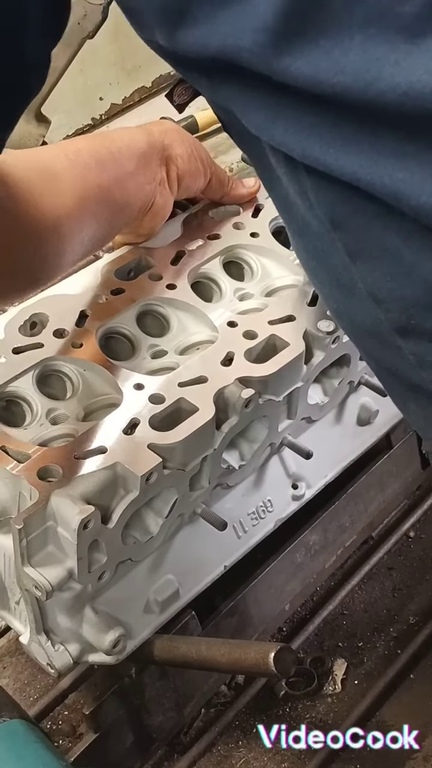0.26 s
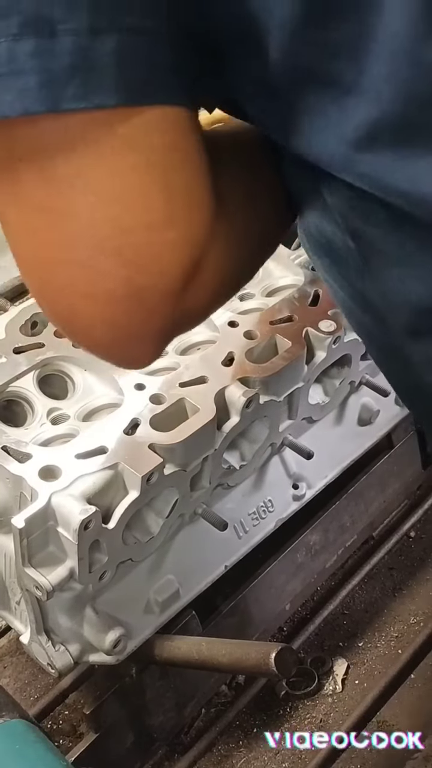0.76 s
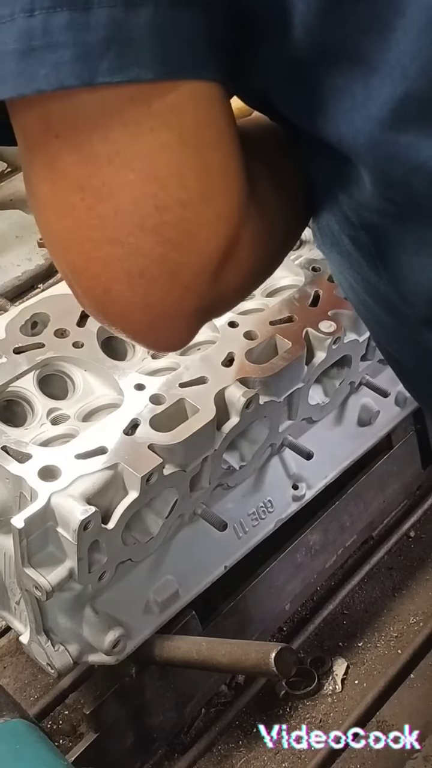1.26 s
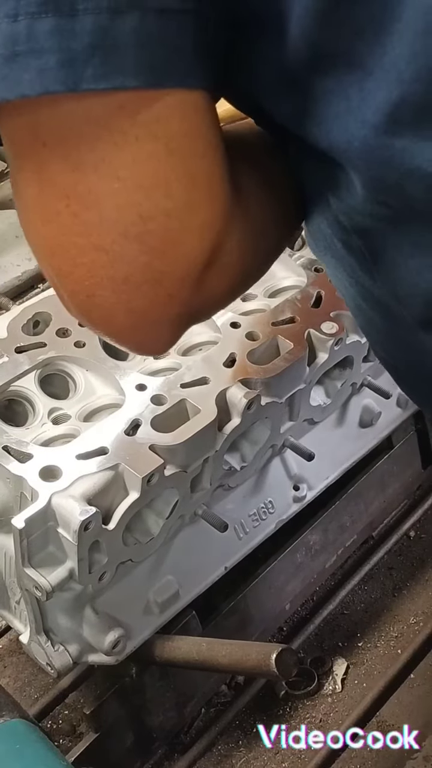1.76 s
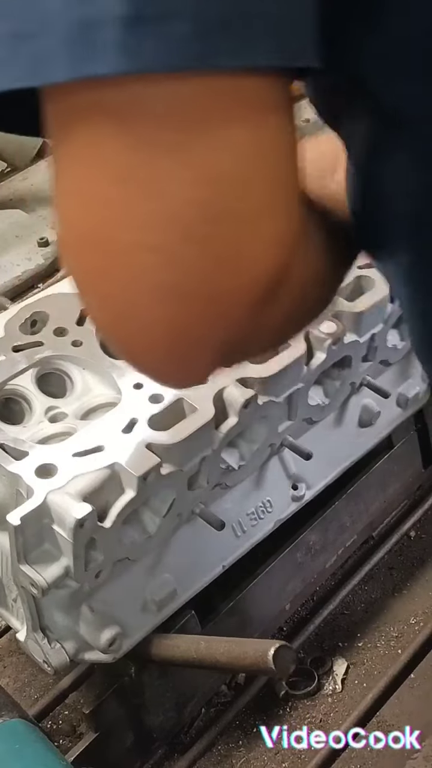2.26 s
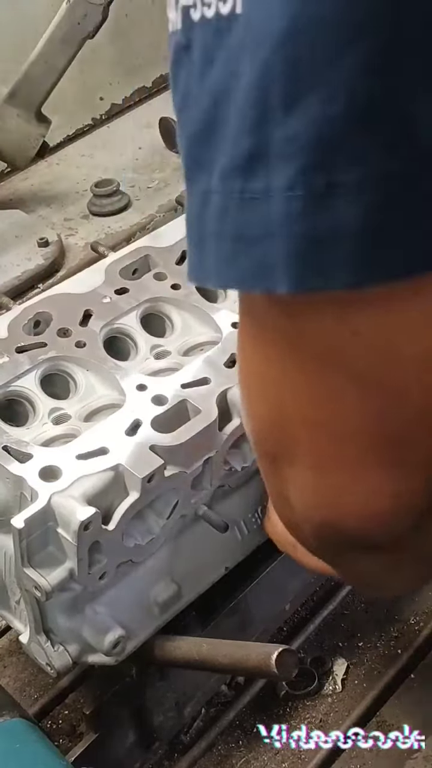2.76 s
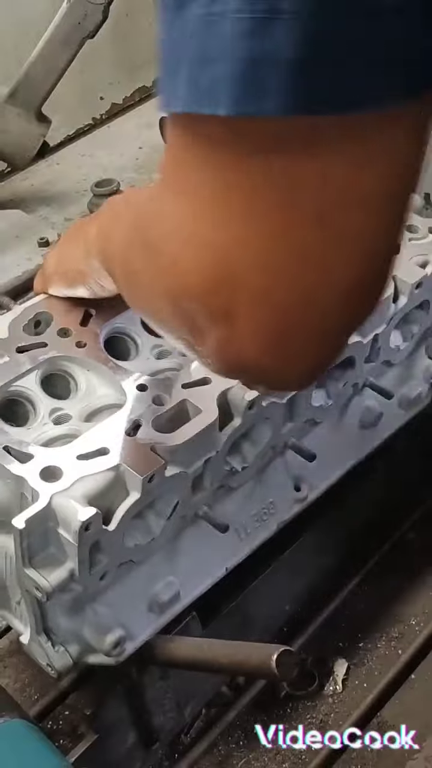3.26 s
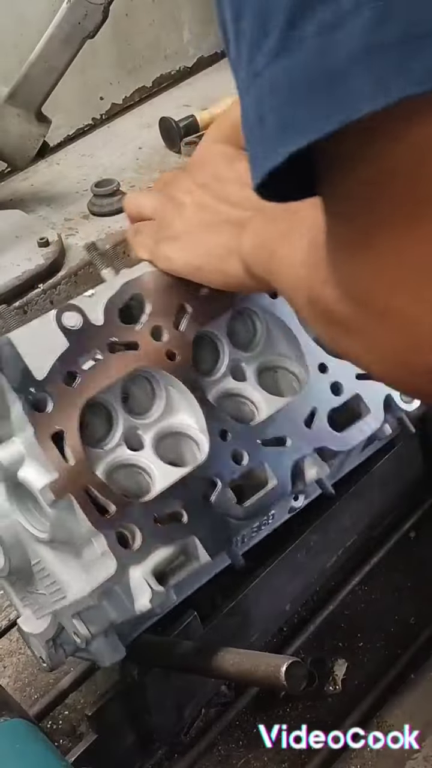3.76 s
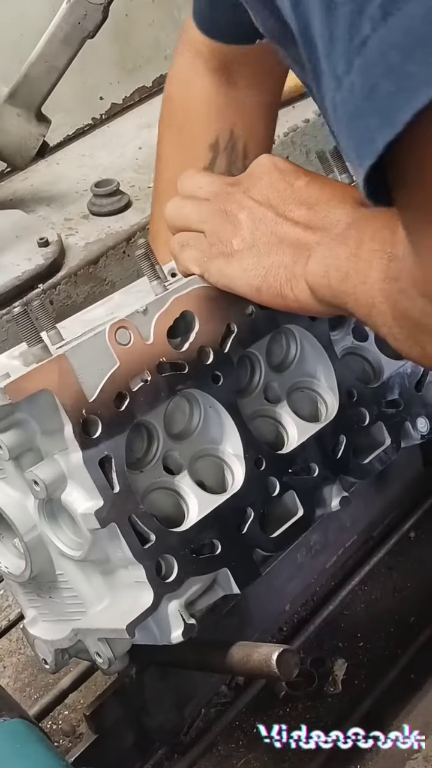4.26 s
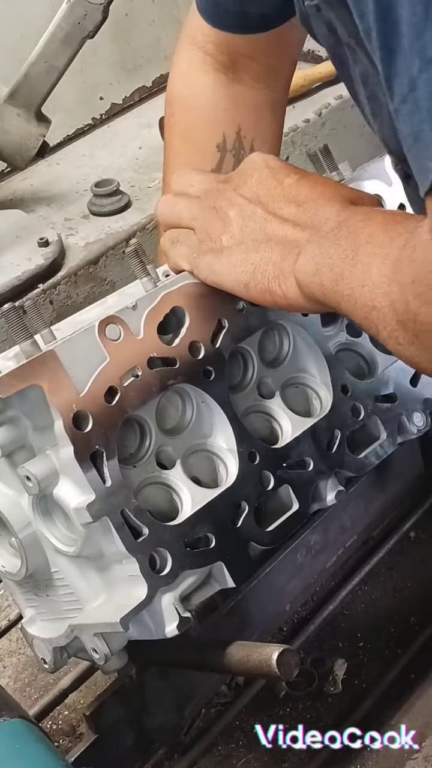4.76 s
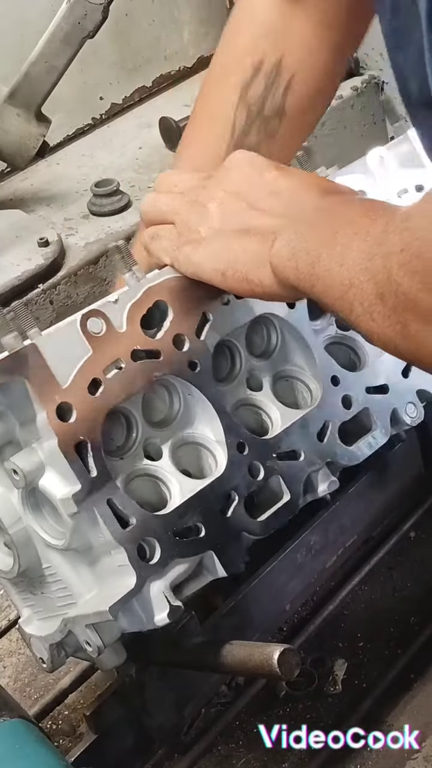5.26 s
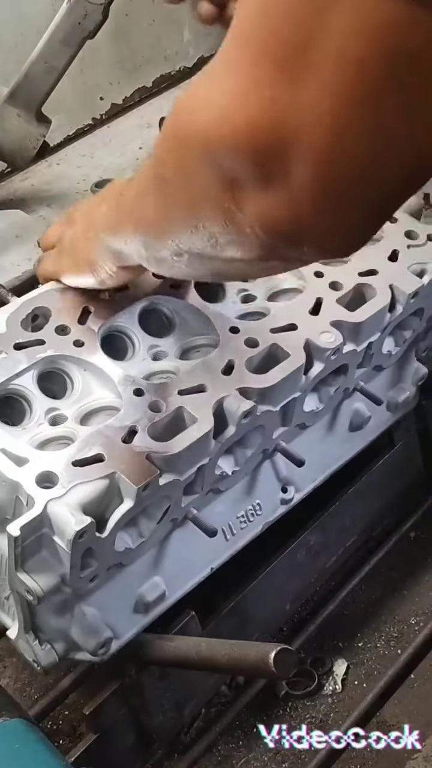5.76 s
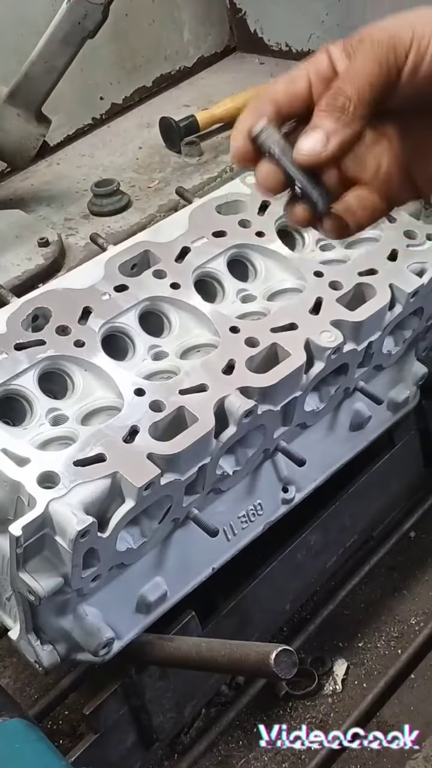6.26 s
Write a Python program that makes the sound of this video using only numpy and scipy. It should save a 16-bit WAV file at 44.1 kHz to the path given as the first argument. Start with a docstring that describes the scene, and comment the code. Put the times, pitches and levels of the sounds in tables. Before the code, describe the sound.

An air hammer rattles in seven short bursts on an aluminium engine head, then the tool is put down and the casting is knocked about on a steel bench.

```python
"""Air hammer on a cylinder head

An air hammer drives a steel punch into an aluminium cylinder head in short bursts, in a hard-walled shop.
Each piston blow is a burst of shaped noise that rings punch and casting modes and lets out a puff of air.
A rattling swell of exhaust air ends the last burst. Then the tool is laid down and the head tipped up and
dropped on the steel bench: softened noise knocks and scrapes, thumps, bench modes and low sagging groans,
over a sine motor hum, noise rumble and a hiss that comes up at about 3 s and ebbs near the end."""
import sys
import numpy as np
from scipy import signal
from scipy.fft import rfft, irfft, next_fast_len
from scipy.io import wavfile

SR = 44100
rng = np.random.default_rng(int(sys.argv[2]) if len(sys.argv) > 2 else 0)


def unload_wav(signal):
    """Save mono or channel-first audio to the path in sys.argv[1] as 16-bit WAV at rate SR, clipped to [-1, 1]."""
    wavfile.write(
        sys.argv[1],
        SR,
        np.round(np.clip(np.atleast_2d(signal).T, -1, 1) * 32767).astype(np.int16),
    )


N = 287513
T = np.arange(N) / SR
FREQS = np.arange(N // 2 + 1) * SR / N
TOP_HZ = 15900  # upper edge of the sound, also the brightness of a hammer blow
RECOIL_DB = -43  # kick of the tool

# trigger pulls: (first blow [s], last blow [s], blows [count], valve shut [s],
# strike [dB, relative], air [dB, relative])
TRIGGER_PULLS = [(-0.01, 0.0757, 5, 0.034, -40, -41.5), (0.2268, 0.311, 4, 0.3, -39, -42.5),
                 (0.5639, 0.604, 2, 0.59, -36, -50.5), (0.8283, 0.8953, 2, 0.84, -37.5, -47),
                 (1.0169, 1.1, 3, 1.062, -37.5, -44.5), (1.2714, 1.364, 4, 1.378, -42, -43.5),
                 (1.526, 1.6288, 5, 1.686, -40.5, -44.5)]
# exhaust air spectrum: (frequency [Hz], density [dB per Hz, relative])
AIR_SPECTRUM = [(40, 4), (130, 5.5), (400, 4), (900, 5), (2500, 4), (4000, 0.5), (5100, -1), (8000, 3.5),
                (9300, -11), (11000, 5), (13700, 6.5), (16000, -3)]
# knocks of tool and casting: (time [s], clack [dB, relative], thump [dB, relative],
# ring [dB, relative], brightness [Hz])
KNOCKS = [(0.765, -55.5, -80, -79, 6160), (1.784, -44.5, -66, -70, 11300), (1.95, -55.5, -71.5, -80, 9400),
          (2.384, -45.5, -48, -69, 5570), (3.0, -67, -61, -85, 900), (3.122, -46.5, -53, -61, 4000),
          (3.43, -63.5, -58.5, -80, 610), (3.735, -49.5, -48.5, -63, 1300),
          (4.016, -51.5, -50.5, -56.5, 1560), (4.453, -59, -68, -68, 1570), (5.041, -61.5, -69, -68, 3970),
          (5.676, -33, -43.5, -46, 6740), (5.729, -47, -47.5, -49.5, 4450), (5.77, -34.5, -39.5, -54, 5770),
          (5.886, -55, -53, -70, 1320), (6.144, -35.5, -39, -52.5, 8800)]


def undb(db):
    """Decibels to gain."""
    return 10 ** (np.asarray(db) / 20)


def at_hz(points, hz):
    """Read (frequency, value) points on a log-frequency axis."""
    f, value = np.transpose(points)
    return np.interp(np.log(hz + 1e-9), np.log(f), value)


def fader(rows):
    """Gain over time from (time [s], level [dB]) rows."""
    return undb(np.interp(T, *np.transpose(rows)))


def noise(spectrum, tilt=0):
    """Stereo noise of rms 1 with this spectrum, tilted in dB per octave above 300 Hz; the bass is most alike."""
    # between the two microphones: (frequency [Hz], likeness [-1 to 1])
    likeness = [(40, 1), (120, 0.8), (300, 1), (700, 0.47), (2000, -0.63), (5000, -0.105), (16000, -0.17)]
    shape = (2, len(FREQS))
    mid, side = rng.standard_normal(shape) * np.exp(2j * np.pi * rng.random(shape))
    like = np.clip(at_hz(likeness, FREQS), -1, 1)
    pair = mid * np.sqrt(1 + like) + np.array([[1], [-1]]) * side * np.sqrt(1 - like)
    colour_db = at_hz(spectrum, FREQS) + tilt * np.log2(np.maximum(FREQS, 300))
    x = irfft(pair * undb(colour_db), next_fast_len(N, True))[:, :N]
    return x / x.std()


def pulse(start, rise, decay, hold=0):
    """Envelope that climbs for rise seconds, holds, then dies away."""
    age, rise = T - start, max(rise, 1e-4)
    climb = np.clip(age / rise, 0, 1)
    return climb * np.exp(-np.maximum(age - rise - hold, 0) / max(decay, 1e-4))


def soften(x, hz):
    """A softer contact pushes for longer and loses the treble above hz."""
    return signal.sosfilt(signal.butter(2, min(hz, SR * .45), fs=SR, output="sos"), x)


def convolve(x, response):
    """Play a sound through a stereo response of unit energy per channel on average."""
    return signal.fftconvolve(x, response / np.sqrt(np.sum(response ** 2) / 2), axes=1)[:, :N]


def ring(modes, hits, scatter_db=2):
    """Decaying sine modes; each (time, level, brightness) hit excites its own mixture of them."""
    times, levels, bright = np.transpose(hits)
    samples = (np.maximum(times, 0) * SR).astype(int)
    out = 0
    for hz, db, t60 in modes:
        scatter = scatter_db * rng.standard_normal(len(hits))
        force = np.zeros(N)
        # a duller hit drives the high modes less
        force[samples] = undb(levels + db + scatter) / np.hypot(1, (hz / bright) ** 2)
        pole = np.exp((2j * np.pi * hz - np.log(1000) / t60) / SR)
        swing = signal.lfilter([1], [1, -pole], force + 1e-18)
        # the microphones hear each mode slightly out of phase, less so in the bass
        phase = min(hz / 2000, 1) * rng.uniform(-1.06, 1, (2, 1))
        out = out + np.imag(swing * np.exp(1j * phase))
    return out


def cavities(x, db, decay_s):
    """Sound rattles around the ports and chambers of the head, which carves close peaks and notches into it."""
    t = T[:SR // 10]
    decay = np.exp(-t / decay_s) * np.sqrt(2 / (decay_s * SR))
    response = undb(db) * rng.standard_normal(len(t)) * decay
    response = response - soften(response, 590)  # the rattle has little bass
    response[0] += 1  # direct sound
    return convolve(x, np.array([response, response]))


def background(hum_db=-4, rumble_db=-4.0, whistle_db=-15, waver=0.19, flutter_db=2.0, hum_hz=119.5):
    """A motor hum wavering in phase and level, low rumble, and a rising and ebbing hiss with a faint whistle."""
    # spectra: (frequency [Hz], density [dB per Hz, relative])
    rumble_spectrum = [(25, -35), (58, 5), (90, -1), (125, 9), (165, -3.5), (210, -7), (290, -9),
                       (600, -14), (1500, -41)]
    hiss_spectrum = [(200, -0.5), (430, 0), (850, -3.5), (1200, -3.5), (1750, -1.5), (2400, -7.5),
                     (5000, -10), (8000, -8), (9500, -13.5), (13000, -8.5), (16000, -5.5)]
    whistle_spectrum = [(1200, -70), (1690, -16), (1745, -4), (1800, -18), (1900, -25), (2600, -62)]
    # hum and rumble together: (time [s], level [dB])
    bass_fader = [(0, -76), (2.25, -75), (2.5, -57), (2.8, -74), (3.25, -54), (4.45, -59.5), (4.95, -54.5),
                  (5.3, -61), (5.9, -55), (6.52, -63.5)]
    # hiss, which comes up at about 3 s and ebbs near the end: (time [s], level [dB])
    hiss_fader = [(0, -75.5), (3.0, -76.5), (3.13, -65.5), (4.2, -61.5), (5.6, -61), (6.05, -66),
                  (6.52, -67.5)]
    knots = np.linspace(0, T[-1], 50)
    level_drift, phase_drift = [np.interp(T, knots, w) for w in rng.standard_normal((2, 50))]
    tone = np.sin(2 * np.pi * hum_hz * T + waver * phase_drift)
    hum = np.sqrt(2) * undb(flutter_db * level_drift) * tone
    bass = undb(hum_db) * hum + undb(rumble_db) * noise(rumble_spectrum)
    hiss = noise(hiss_spectrum) + undb(whistle_db) * noise(whistle_spectrum)
    return fader(bass_fader) * bass + fader(hiss_fader) * hiss


def blows(stroke_s=0.022, slowing=3.3, first_db=1.5, last_db=-1):
    """Rows (time, strike dB, air dB): a steady piston cycle whose later strokes drift, mostly ever slower."""
    rows = []
    for first, last, count, _, strike_db, air_db in TRIGGER_PULLS:
        k = np.arange(int(round(count)))
        # each stroke's drift is "slowing" times the one before, so the last blow lands on time
        lag = (slowing ** k - 1) / (slowing ** k[-1] - 1)
        times = first + stroke_s * k + lag * (last - first - stroke_s * k[-1])
        # the first blow is accented: the piston has a longer run-up
        accent_db = first_db * (k == 0) + last_db * (k == k[-1])
        rows += [(s, strike_db + db, air_db) for s, db in zip(times, accent_db)]
    return rows


def valve(leak_db=-15, leak_tilt_db=-2.0, open_tilt_db=-0.48, leak_lead_s=0.024, open_lead_s=0.002,
          closing_s=0.011):
    """Air leaks in with a dull hiss, brightens as the trigger is squeezed and bleeds away when it is let go."""
    air, dull, bright = 0, noise(AIR_SPECTRUM, leak_tilt_db), noise(AIR_SPECTRUM, open_tilt_db)
    for first, _, _, shut, _, db in TRIGGER_PULLS:
        leak = first - leak_lead_s  # the leak starts, then the valve is open, before the first blow
        squeeze = np.clip((T - leak) / max(leak_lead_s - open_lead_s, 1e-3), 0, 1)
        bleed = np.exp(-np.maximum(T - shut, 0) / closing_s)
        flow = undb(db + leak_db * (1 - squeeze)) * (T > leak) * bleed
        air = air + flow * (squeeze * bright + np.sqrt(1 - squeeze ** 2) * dull)
    return air


def casting(force, db, t60):
    """A thicket of weak, close modes, drawn as decaying noise, makes the struck head shimmer."""
    # (frequency [Hz], density [dB per Hz, relative])
    shimmer_spectrum = [(300, -21), (1200, -41), (1800, 7), (2500, -34), (3300, 0.5), (4600, 8.5),
                        (5050, 3), (5600, 11.5), (8400, 8.5), (9100, 12.5), (11500, 8), (16000, -12)]
    shimmer = noise(shimmer_spectrum) * np.exp(-np.log(1000) * T / t60)
    return undb(db) * convolve(force, shimmer[:, :SR])


def hammer(strike_db=-3, chatter_s=0.0026, fade_s=0.0074, puff_s=0.0067, puff_over_flow_db=4.5, hollow=0.78):
    """The punch chatters for a few ms at each blow and the cylinder vents through the hollow barrel."""
    # (frequency [Hz], density [dB per Hz, relative])
    strike_spectrum = [(100, -3), (900, -18), (1800, -1.5), (2500, -1.5), (3400, 4), (4500, 2),
                       (5100, -5.5), (6000, -4), (8300, -2), (9100, -8), (11500, -10), (16000, -8)]
    # colour of barrel and exhaust ports: (frequency [Hz], width [Hz], boost [dB, before the hollow factor])
    barrel_colour = [(820, 250, 1), (2500, 350, -2), (3330, 250, 2), (3950, 100, 4), (4170, 120, -5),
                     (4620, 100, 3), (5090, 130, -6), (5960, 100, -4), (7270, 120, 4), (8300, 140, 4),
                     (8790, 130, -9), (9270, 180, -4), (10330, 150, -5), (13750, 160, 4), (14950, 250, 3),
                     (15500, 350, 6)]
    strike = sum(undb(db) * pulse(s, 0.0014, fade_s, hold=chatter_s) for s, db, _ in blows())
    puff = sum(undb(db + puff_over_flow_db) * pulse(s, 0.0028, puff_s) for s, _, db in blows())
    crack = undb(strike_db) * strike * noise(strike_spectrum)
    shimmer = casting(crack, db=-0.5, t60=0.26)
    tool = crack + shimmer + puff * noise(AIR_SPECTRUM) + valve()
    tool = cavities(tool, db=-7, decay_s=0.0034)
    colour_db = sum(db * np.exp(-((FREQS - hz) / width) ** 2) for hz, width, db in barrel_colour)
    return irfft(rfft(tool) * undb(hollow * colour_db), N)


def recoil(decay_s=0.0099):
    """The tool kicks back with a dry thud of low noise at each blow."""
    # (frequency [Hz], density [dB per Hz, relative])
    thud_spectrum = [(25, -42), (60, 0.5), (160, 6), (230, -12), (450, -0.5), (900, -1), (2000, -1),
                     (6000, -25)]
    kicks = sum(pulse(s, 0.0019, decay_s) for s, _, _ in blows())
    return undb(RECOIL_DB) * noise(thud_spectrum) * kicks


def ringing(punch_db=-21, head_db=-25, bounce_db=-3, bench_db=-5):
    """Blows ring punch and head and bounce the head on its seat; knocks and swells ring head and bench."""
    # modes: (frequency [Hz], level [dB, relative], t60 [s])
    punch_modes = [(3300, -4, .4), (3945, -1, .35), (4010, -1, .6), (4409, -4, .6), (4610, 0, .6),
                   (4660, -3, .4), (5335, -4, .5), (5647, -6, .5), (6412, -7, .5), (7280, -3, .35),
                   (7705, -4, .4), (8037, -4, .5), (8310, -4, .45), (12042, -5, .4), (12920, -5, .35),
                   (13755, -1, .35), (15025, -4, .3), (15700, -4, .35)]  # the steel punch
    head_modes = [(1174, -3, 0.37), (1223, -31, 0.2), (1440, -31, .2), (1720, -1.5, 0.43), (1728, -9, 0.88),
                  (2163, -8, 0.22), (2720, 2.5, 0.17), (3640, 3, 0.22), (3540, -4, 0.22), (4680, -14, 0.64)]  # the cylinder head
    bounce_modes = [(162.4, -16, 0.64)]  # the head bouncing on the bench under the hammer
    bench_modes = [(138, 1, .42), (272, 0, .55), (415, -9, .3), (485, -9, .25), (545, -10, .25),
                   (630, -6, .3)]  # the bench
    struck = [(s, db, TOP_HZ) for s, db, _ in blows()]
    # a knock or swell rings halfway up its rise
    rattled = [(s + rise / 2, db, hz) for s, _, _, db, hz, rise, _ in knocks_and_swells()]
    punch = undb(punch_db) * ring(punch_modes, struck)
    head = ring(head_modes, [(s, db + head_db, hz) for s, db, hz in struck] + rattled)
    bounce = ring(bounce_modes, [(s, RECOIL_DB + bounce_db, hz) for s, _, hz in struck])
    bench = ring(bench_modes, [(s, db + bench_db, hz) for s, _, db, _, hz, _, _ in knocks_and_swells()])
    return punch + head + bounce + bench


def room(x, build_s=0.00077):
    """Reflections, drawn as banded noise, build up quickly and fade sooner in the treble."""
    # the shop's reverberation: (frequency [Hz], t60 [s])
    room_t60 = [(100, 0.81), (500, 0.51), (2000, 0.45), (8000, 0.37), (16000, 0.36)]
    t = T[:SR]
    hz = np.arange(SR // 2 + 1.)
    bins = rfft(rng.standard_normal((2, SR)))
    centres = np.geomspace(60, 16000, 9)
    tail = 0
    for centre, share in zip(centres, np.eye(len(centres))):
        band = irfft(bins * at_hz(np.c_[centres, share], hz), SR)
        tail = tail + band * np.exp(-np.log(1000) * t / at_hz(room_t60, centre))
    return convolve(x, tail * (1 - np.exp(-t / build_s)))


def knocks_and_swells(knock_rise_s=0.0017, knock_decay_s=0.024, contact_cycles=5.0,
                      swell_decay_s=0.044, swell_thump_db=-61, swell_ring_db=-16):
    """Rows (time, clack dB, thump dB, ring dB, brightness Hz, rise s, decay s): sharp knocks, slower swells."""
    # scrapes of metal and first, at 1.6 s, a rattling swell of exhaust air:
    # (time [s], rise [s], level [dB, relative], brightness [Hz])
    swell_rows = [(1.604, 0.015, -36.5, 7850), (2.352, 0.023, -64.5, 5960), (3.075, 0.0089, -52.5, 13800),
                  (3.268, 0.023, -50, 2220), (4.638, 0.012, -59.5, 3660), (4.772, 0.017, -52, 8200),
                  (5.11, 0.023, -54, 3440), (5.643, 0.024, -53, 7200), (6.081, 0.006, -54, 2880)]
    # a duller contact also takes longer to rise
    knocks = [(s, db, thump, ring_db, hz, knock_rise_s + contact_cycles / hz, knock_decay_s)
              for s, db, thump, ring_db, hz in KNOCKS]
    # a swell rings the head in proportion to its own level
    swells = [(s, db, swell_thump_db, db + swell_ring_db, hz, rise, swell_decay_s)
              for s, rise, db, hz in swell_rows]
    return knocks + swells


def handling(thump_s=0.053, thump_db=-3, grit=0.32, tick_db=-1.5, tick_s=0.0021):
    """Knocks and swells are bursts of grainy, softened noise, each with a slower thump of the bench."""
    # spectra: (frequency [Hz], density [dB per Hz, relative])
    clack_spectrum = [(60, -28), (250, -13.5), (450, -6), (650, 5.5), (850, 1.5), (1250, 2), (1800, 0),
                      (2400, -1.5), (3300, -0.5), (4600, -2.5), (7500, -2), (9300, -6.5), (12500, -2.5),
                      (16000, -2)]
    thump_spectrum = [(30, -37), (80, -30), (135, 1.5), (200, -4.5), (275, -10.5), (330, -13.5), (410, -7),
                      (600, -11.5), (1500, -43)]
    knots = np.linspace(0, T[-1], N // 50)
    grains = np.exp(grit * np.interp(T, knots, rng.standard_normal(N // 50)))
    grating, clack = noise(clack_spectrum) * grains, 0
    for s, db, _, _, hz, rise, decay in knocks_and_swells():
        touch = soften(grating, hz)
        clack = clack + undb(db) * pulse(s, rise, decay) * touch / touch.std()
    # the first contact of each knock is a brighter, shorter tick
    for s, db, _, _, hz in KNOCKS:
        touch = soften(grating, 2 * hz)
        clack = clack + undb(db + tick_db) * pulse(s, 0.00071, tick_s) * touch / touch.std()
    thump = sum(undb(db + thump_db) * pulse(s, rise + 0.0048, thump_s)
                for s, _, db, _, _, rise, _ in knocks_and_swells())
    return cavities(clack, db=-6, decay_s=0.0035) + thump * noise(thump_spectrum)


def rocking(start=3.3, end=4.1, db=-55, low_hz=130, high_hz=520, length_s=0.017, sag=1.8, count=22):
    """The head grinds on its edge while it is tipped up: short low groans that sag in pitch."""
    out = 0
    places = (np.arange(count) + rng.random(count)) / count
    for place, pitch in zip(places, rng.random(count)):
        age = T - start - place * (end - start)
        hz = low_hz * (high_hz / low_hz) ** pitch
        groan = np.exp(-(age / length_s) ** 2) * np.sin(2 * np.pi * hz * age * (1 - sag * age))
        out = out + np.sqrt(low_hz / hz) * groan  # higher groans are quieter
    return undb(db) * out


def scene(hammer_room_db=-6, knock_room_db=-3, mic_lag_s=.00012):
    """Tool and bench in the shop; the bass leans right, the treble left, and one microphone hears slightly earlier."""
    # stereo balance: (frequency [Hz], left minus right [dB])
    balance = [(60, -3), (500, -3), (1000, -2.5), (2000, -0.5), (4000, 1), (8000, 3), (14000, 2)]
    tool, handled = hammer(), handling()
    echoes = room(undb(hammer_room_db) * tool + undb(knock_room_db) * handled)
    mix = tool + handled + echoes + recoil() + ringing() + rocking() + background()
    half = np.array([[.5], [-.5]])  # each channel takes half of the difference
    lean = undb(half * at_hz(balance, FREQS)) * np.exp(2j * np.pi * FREQS * half * mic_lag_s)
    return irfft(rfft(mix) * lean, N)


def record(dry, bass_hz=36):
    """The phone thins the deepest bass and cuts the top."""
    thinned = signal.sosfilt(signal.butter(2, bass_hz, "high", fs=SR, output="sos"), dry)
    return signal.sosfilt(signal.ellip(10, .2, 70, TOP_HZ, fs=SR, output="sos"), thinned)


dry = scene()
out = record(dry)
unload_wav(out)
```